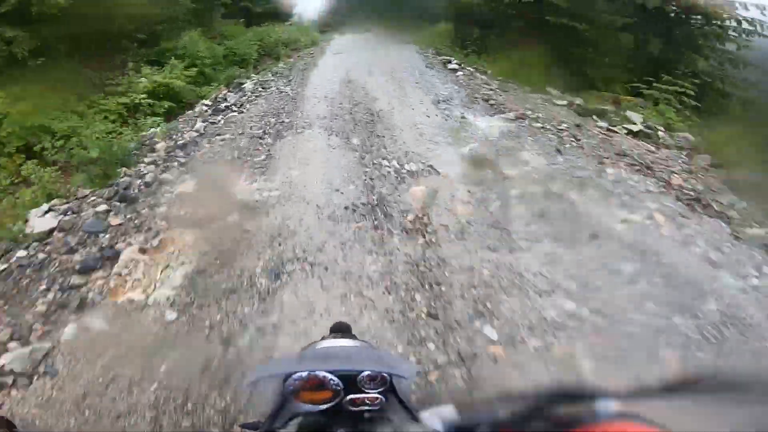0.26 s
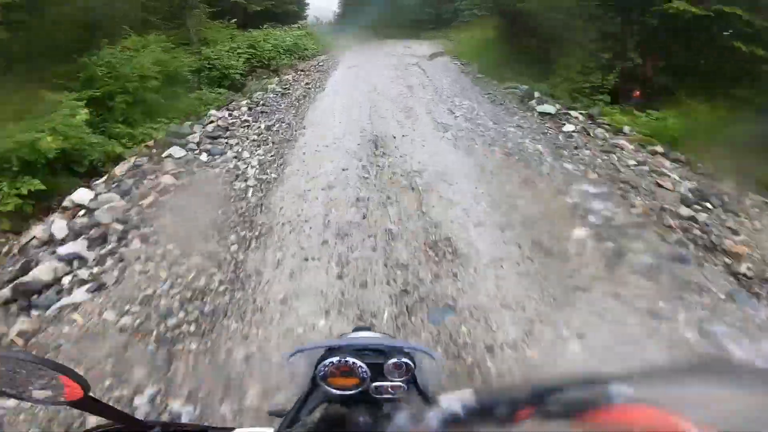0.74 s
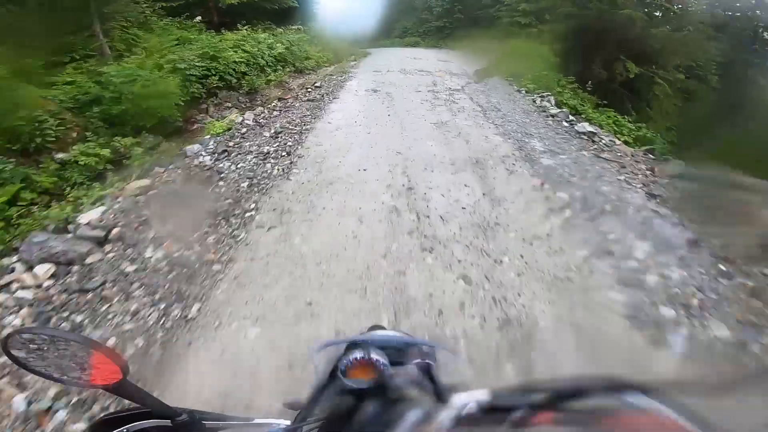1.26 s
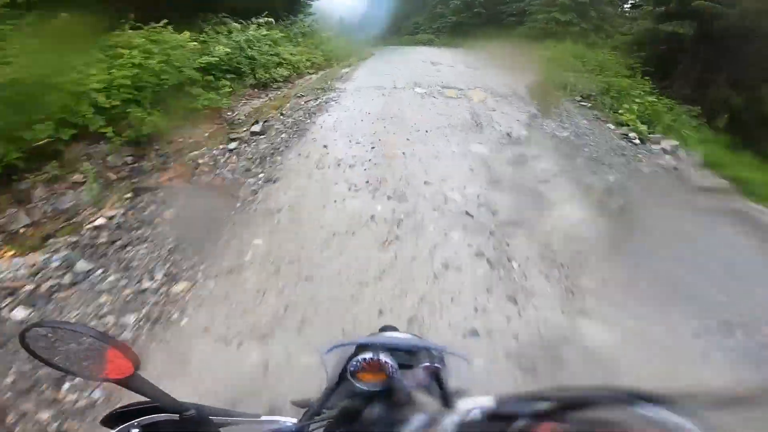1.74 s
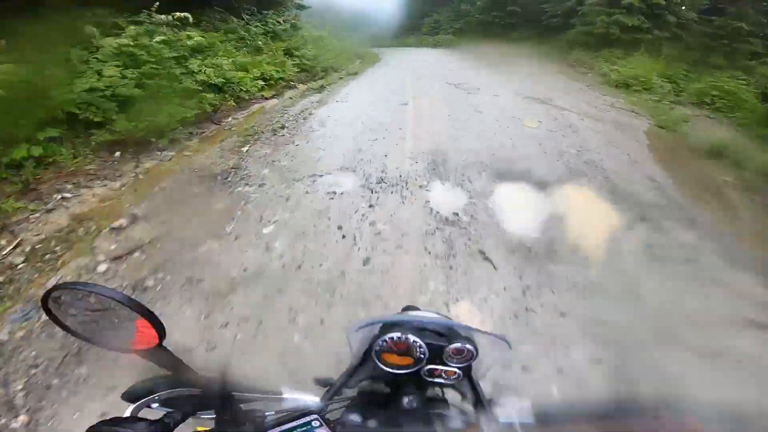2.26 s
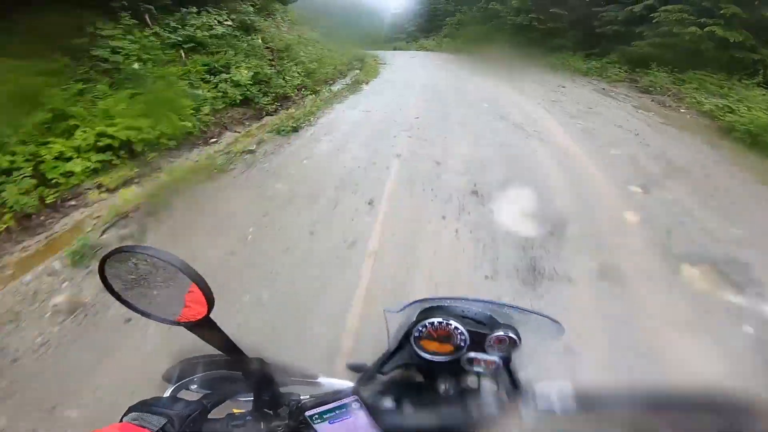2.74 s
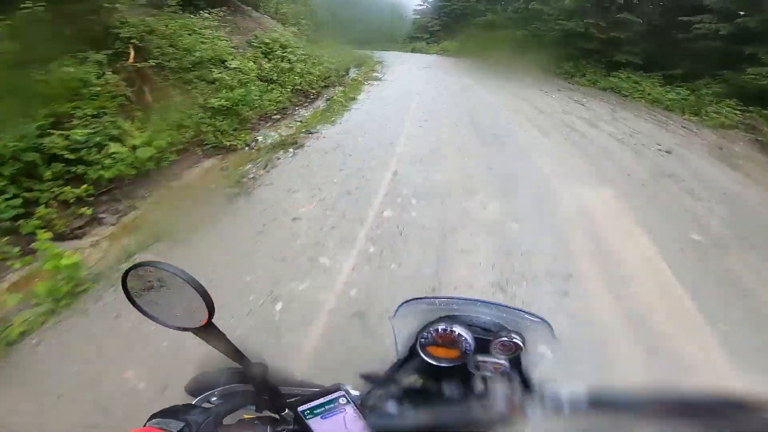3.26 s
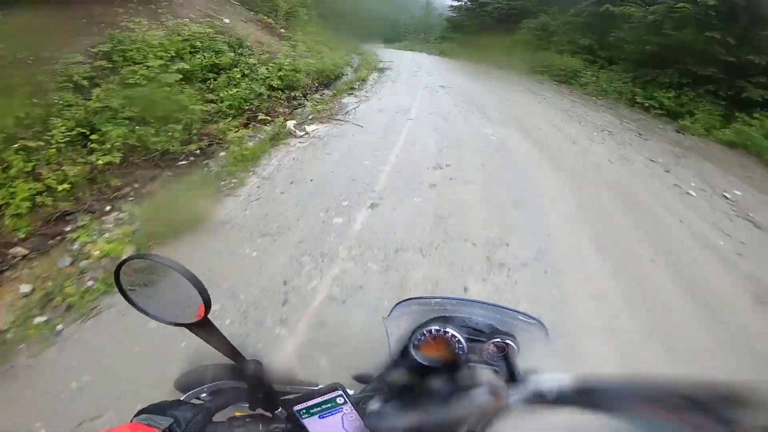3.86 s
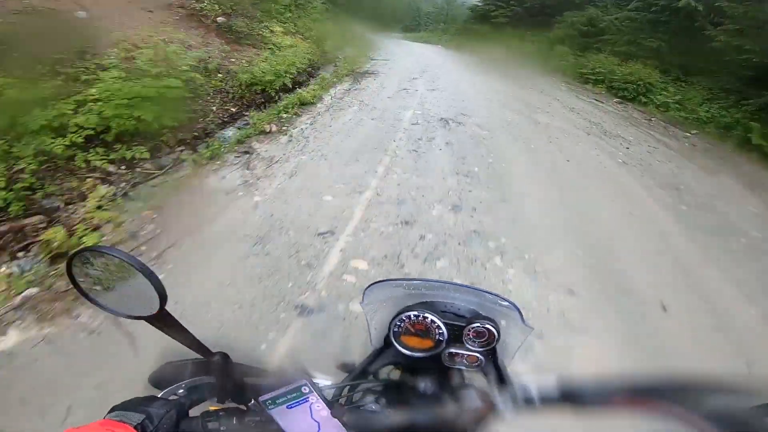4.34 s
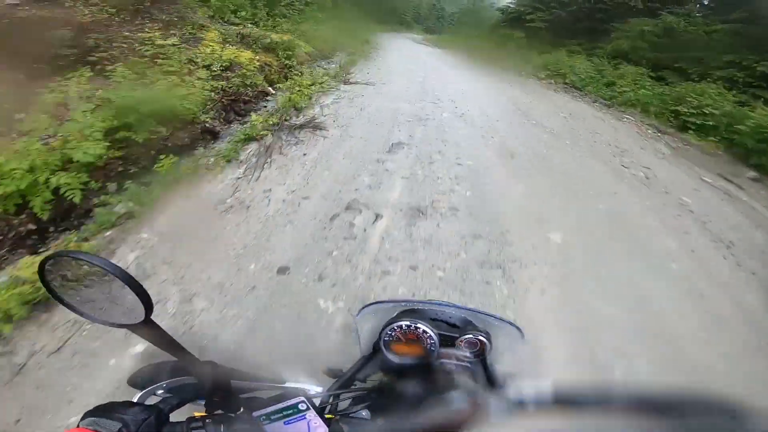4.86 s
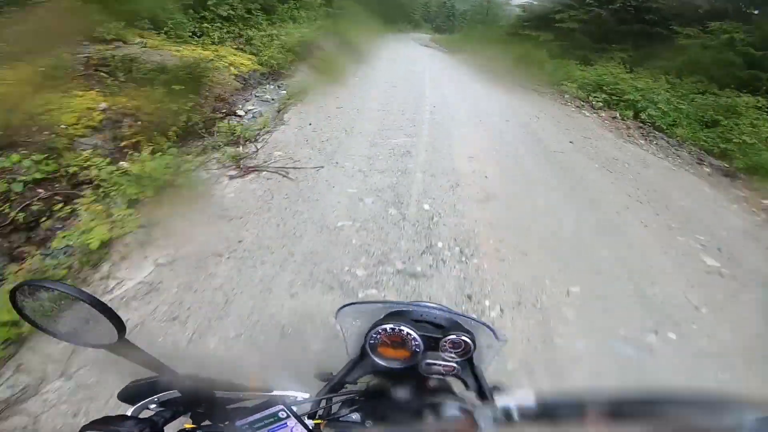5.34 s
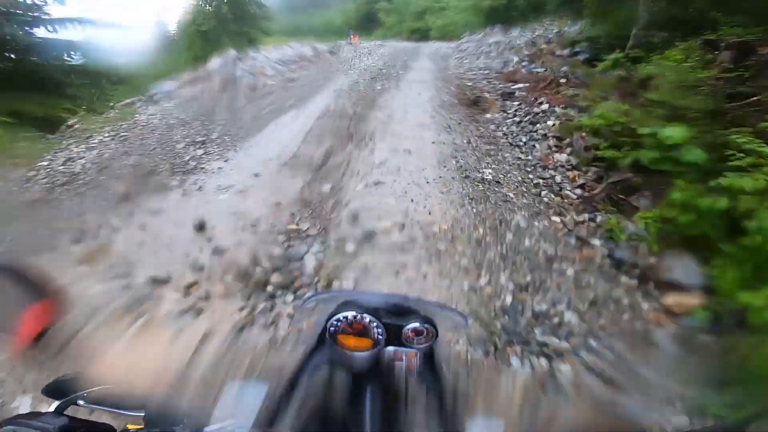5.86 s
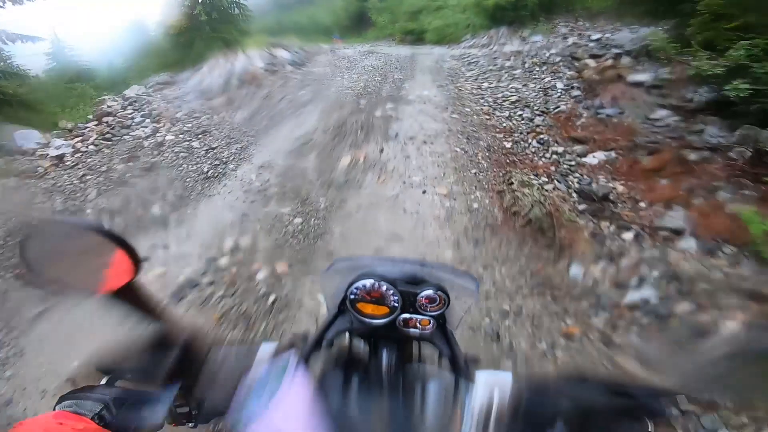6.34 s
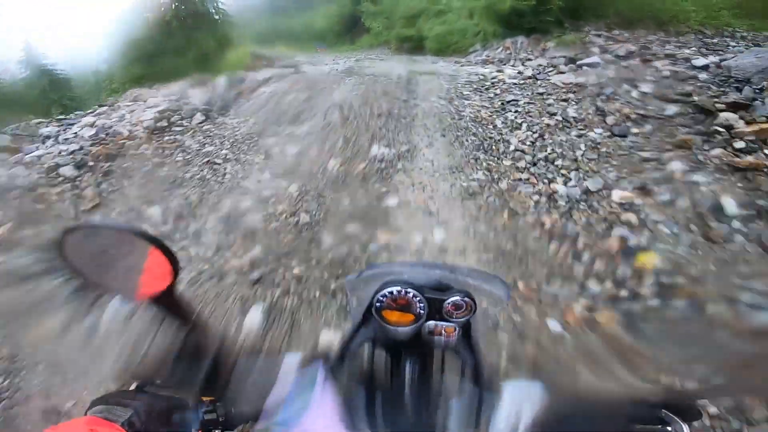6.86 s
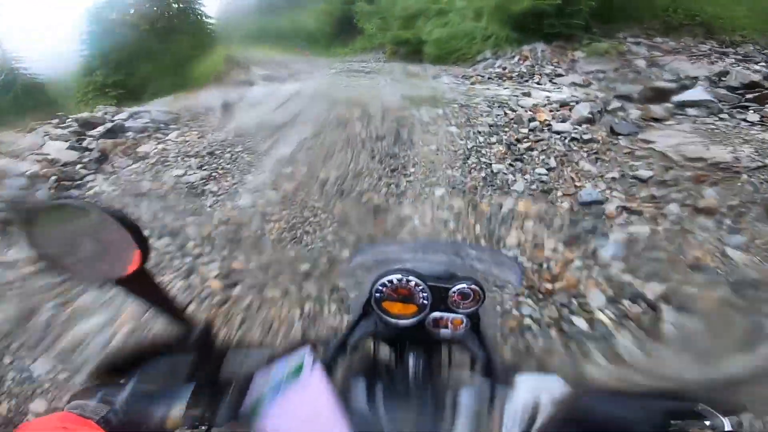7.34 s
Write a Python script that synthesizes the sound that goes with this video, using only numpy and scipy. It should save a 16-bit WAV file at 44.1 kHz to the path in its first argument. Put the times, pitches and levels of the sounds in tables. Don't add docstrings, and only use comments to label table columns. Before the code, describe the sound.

Low throbbing exhaust of a one-cylinder motorcycle over gritty wet tyre noise, with panel rattles and ticking drops, dropping abruptly to a slower beat.

```python
import sys
import numpy as np
from scipy import signal
from scipy.io import wavfile
from scipy.ndimage import uniform_filter1d

SR = 44100
rng = np.random.default_rng(int(sys.argv[2]) if len(sys.argv) > 2 else 0)


def nominal_scale(level):
    x = np.asarray(level, float) / 20
    return 10 ** x


def store_pcm(level_fs):
    pcm = np.round(np.clip(level_fs, -1, 1) * 32767).astype(np.int16)
    wavfile.write(sys.argv[1], SR, np.atleast_2d(pcm).T)


N = 335160
T = np.arange(N) / SR
CUT = round(5.567 * SR)
SLOW = np.arange(N) > CUT


def in_time(table):
    s, *columns = np.transpose(np.vstack(table))
    return [np.interp(T, s, c) for c in columns]


def swells(rows, rest_db, rise_s, fall_s):
    curves = []
    for s, hold, db in rows:
        corners = [s - rise_s, s, s + hold, s + hold + fall_s]
        curves.append(np.interp(T, corners, [rest_db, db, db, rest_db]))
    return np.max(curves, axis=0)


def rms_one(x):
    return x / np.sqrt(np.mean(x ** 2) + 1e-20)


def evened(x, over_s):
    power = uniform_filter1d(x ** 2, round(over_s * SR))
    return rms_one(x / (power + 1e-3 * np.mean(x ** 2)) ** .35)


def noise():
    return rng.standard_normal(N)


def drift(rate):
    r = np.exp(-80 * np.pi * rate / SR)
    slow = signal.lfilter([1], [1, -2 * r, r * r], rng.standard_normal(N // 40 + 2002))[2000:]
    return np.interp(np.arange(N) / 40, np.arange(len(slow)), rms_one(slow))


def ring(x, hz, width):
    r, w = np.exp(-np.pi * width / SR), 2 * np.pi * hz / SR
    return signal.lfilter([0, np.sin(w)], [1, -2 * r * np.cos(w), r * r], x + 1e-18)


def body(x, modes):
    return rms_one(sum(nominal_scale(db) * width * ring(x, hz, width) for hz, width, db in modes))


def band(x, low_hz, high_hz, order=2):
    return signal.sosfilt(signal.butter(order, [low_hz, high_hz], "band", fs=SR, output="sos"), x)


def textured(spectrum, source, patchy_db, unit_hz):
    hz, db = np.transpose(spectrum)
    edges = hz[0] * 2 ** np.arange(0, np.log2(hz[-1] / hz[0]) + .01, 1 / 3)
    together = .4 * drift(6) + .6 * drift(25)
    out = 0
    for k, (low, high) in enumerate(zip(edges, edges[1:])):
        level_db = np.interp(np.log(low * high) / 2, np.log(hz), db)
        flicker_db = patchy_db * (together + drift(27))
        out = out + nominal_scale(level_db + flicker_db) * band(source[k % 2], low, high)
    return out / np.std(band(out, *unit_hz, order=4))


def grit(per_s, spread_db, share):
    sizes = nominal_scale(spread_db * np.minimum(rng.exponential(1, (2, N)), 5)) * rng.choice([-1, 1], (2, N))
    clicks = rms_one(sizes * (rng.random((2, N)) < per_s / SR))
    return np.sqrt(share) * clicks + np.sqrt(1 - share) * rng.standard_normal((2, N))


def clicks_at(events):
    out = np.zeros(N)
    for s, db, *rest in events:
        out[min(round(s * SR), N - 1)] = nominal_scale(db)
    return out


def struck(events, width):
    return sum(ring(clicks_at([row]), row[2], width) for row in events)


# t/s, firings per second
ENGINE_SPEED = [(0.0, 29.38), (1.18, 31.71), (1.39, 29.64), (2.14, 31.58), (2.22, 32.92), (2.72, 28.33),
                (2.87, 29.55), (3.32, 27.35), (3.45, 27.61), (5.19, 25.77), (5.567, 27.71), (5.568, 23.47),
                (5.78, 22.48), (6.16, 24.74), (6.37, 22.79), (6.92, 22.57), (7.0, 20.66), (7.6, 20.38)]


def firing_cycle():
    per_s, = in_time(ENGINE_SPEED)
    cycle = np.cumsum(per_s) / SR
    cycle[CUT:] += np.ceil(cycle[CUT]) - cycle[CUT]
    return per_s, cycle


def once_a_cycle(cycle):
    return np.diff(np.floor(cycle), prepend=-1) > 0


# t/s, throttle 0-1, strain 0-1, burn level/dB
RIDER = [(0.0, 0.95, 0.63, -5.5), (.85, 0.84, 0.65, -3.5), (1.0, 0, 0.05, -3), (1.65, 0.61, 0, -0.5),
         (1.87, 0.57, 0.12, 1), (2.03, 0, 0.1, -5.5), (2.2, 0.9, 0.42, -2), (2.7, 0.27, 0.2, -3),
         (3.05, 0.71, 0.47, -0.4), (4.4, 0.59, 0, -2), (5.56, 0.37, 0.31, -3), (5.58, 0.15, 0, 1.5),
         (6.0, 0, 0.07, -3), (6.27, 0.5, 0.52, -2.5), (6.56, 0.99, 0.69, -3.5), (6.8, 1, 0.75, -2.5),
         (7.0, 0.02, 0.35, -3.5), (7.6, 0.37, 0.26, 1)]


def rider():
    return in_time(RIDER)


# t/s, length/s, loss/dB
CALMS = [
    (2.3, .5, 2.0),
    (6.2, 0.55, 2),
]


def calm_db():
    return swells(CALMS, 0, .1, .1)


# t/s, length/s, top f/Hz
AIRY = [(.35, .015, 14500), (.85, .015, 14300), (1.49, .015, 14400), (3.06, .02, 15100), (3.24, .02, 15800),
        (3.31, .02, 15100), (4.35, .02, 14400), (4.52, .02, 14400), (4.6, .02, 15600), (4.64, .03, 15000),
        (4.73, .02, 14400), (5.31, .02, 14400), (5.38, .02, 14400), (5.57, .02, 15900), (5.67, .02, 15900),
        (5.72, .08, 15100), (5.88, .02, 15100), (6.65, .2, 14100), (6.85, .13, 14400), (7.02, .13, 14300),
        (7.15, .2, 15000), (7.35, .15, 15300), (7.5, .1, 15800)]


def top_hiss():
    hiss, out = noise(), np.zeros(N)
    for s, hold, top_hz in AIRY:
        span = (T >= s) & (T < s + hold)
        out[span] = band(hiss[span], 13600, top_hz, order=4) * np.hanning(span.sum()) ** .25
    return nominal_scale(-76.0) * out


def port_hiss():
    return nominal_scale(-77.5) * rms_one(band(noise(), 10300, 11200))


def wind():
    gusts = rms_one(band(noise() * nominal_scale(3.5 * drift(4.8)), 24, 58, order=3))
    return nominal_scale(-27.0 - .6 * calm_db()) * gusts


# t/s, level/dB
SURFACE = [(0, 4), (.9, 6), (1.9, 1.5), (2.6, 4), (3.25, 0.5), (3.45, -1), (4.9, -2.5), (5.75, -2.5),
           (6.7, 0.7), (7.15, -3), (7.6, -4.5)]


def looseness():
    return in_time(SURFACE)[0]


# f/Hz, level/dB per Hz
RUMBLE = [(125, -2), (190, -0.5), (320, -1), (500, -10), (800, -14)]
# t/s, length/s, loss/dB
QUIETER = [
    (0.17, 0.46, 1.5),
    (6.3, 0.74, 1.5),
    (5.62, 0.51, 3),
    (7.15, .45, 5),
]


def frame_rumble(per_s, gate, loose_db):
    rumble = textured(RUMBLE, gate ** 0.59 * rng.standard_normal((2, N)), patchy_db=1.0, unit_hz=(150, 230))
    level_db = -34 + 0.54 * loose_db + 0.29 * (per_s - 26.0)
    level_db += 0.5 * np.clip(22 - per_s, 0, 2) - swells(QUIETER, 0, 0.049, 0.23)
    return nominal_scale(level_db) * rumble


# t/s, length/s, level/dB
WHEEL_RINGS = [
    (.75, 0.82, 2.5),
    (1.82, 0.45, 3.5),
    (2.5, 0.35, 3),
    (3.05, 0.23, 2.5),
]


def wheel(loose_db):
    spokes = rms_one(ring(noise(), 2938, 58))
    return nominal_scale(-51.5 + loose_db + swells(WHEEL_RINGS, 0, 0.053, 0.14)) * spokes


# f/Hz, level/dB per Hz
TYRE = [(420, 6.5), (600, -0.5), (900, 5), (1300, 0), (1700, 2.5), (2050, -6.5), (2600, 0), (3200, -11.5),
        (3700, -26), (4300, -24)]


def tyres(gate, loose_db):
    source = gate * grit(1500, spread_db=2.0, share=0.37)
    return nominal_scale(-41.5 + loose_db) * textured(TYRE, source, patchy_db=0.98, unit_hz=(1500, 2100))


# f/Hz, level/dB per Hz
SPRAY = [(3400, 5.5), (4200, -3), (5200, 4.5), (6300, -7.5), (7800, -7), (8800, -17), (9600, -35),
         (10700, -19.5), (11700, -36), (13900, -35.5)]
# t/s, length/s, level/dB
PUDDLES = [
    (5.77, 0.035, 5),
    (5.92, .02, 4),
    (5.99, 0.028, 5),
    (6.15, .35, 1.5),
    (7.02, .05, 2.5),
    (6.55, 0.71, 2),
]


def water_spray(gate, loose_db):
    source = gate * grit(900, spread_db=4.0, share=.12)
    spray = textured(SPRAY, source, patchy_db=.45, unit_hz=(4000, 9000))
    spray[CUT:] -= .5 * band(spray, 8100, 9900)[CUT:]
    return nominal_scale(-55.6 + 0.59 * loose_db + swells(PUDDLES, 0, .012, .04)) * spray


# t/s, length/s, level/dB
LOOSE_STONES = [
    (7.25, 0.38, 3.5),
    (0.6, 0.37, 5.5),
    (1.5, 0.23, 7),
]


def loose_stones():
    clatter = rms_one(band(grit(430, spread_db=2.0, share=0.55)[0], 460, 900))
    return nominal_scale(-41.5 + swells(LOOSE_STONES, -23.0, .1, 0.079)) * clatter


# t/s, length/s, level/dB
PATCHES = [
    (0.32, 0.14, -33.5),
    (.68, 0.19, -32),
    (2.2, .4, -52.5),
    (3.0, .2, -55),
    (6.55, 0.57, -37),
    (7.3, 0.42, -41),
]


def gravel_crunch():
    grains = grit(800, spread_db=-9.0, share=0.074)[0] * nominal_scale(2.0 * drift(39))
    crunch = band(rms_one(band(grains, 800, 1650)), 200, 7000)
    return nominal_scale(swells(PATCHES, -48, rise_s=0.36, fall_s=0.23)) * crunch


# t/s, length/s, share lost
THINNED = [
    (5.9, 0.63, 0.43),
    (4.5, 0.25, 0.25),
]


def road(per_s, gate):
    loose_db = looseness()
    out = wind() + wheel(loose_db) + frame_rumble(per_s, gate, loose_db)
    out += tyres(gate, loose_db) + water_spray(gate, loose_db) + loose_stones()
    out -= swells(THINNED, 0, 0.062, .15) * band(out, 370, 760)
    return out + gravel_crunch() + port_hiss()


# t/s, peak level/dB
DROPS = [(0.0772, -58), (0.2862, -58), (0.3421, -62), (1.1638, -63), (1.2266, -60), (2.0901, -58),
         (2.1515, -60), (2.5351, -59), (2.6484, -59), (3.2395, -61), (3.899, -63), (5.4545, -67),
         (5.5174, -60), (5.7324, -49), (7.2639, -54), (7.3158, -62), (7.3951, -62), (2.2233, -65),
         (2.4324, -53), (2.4768, -51), (2.6988, -55), (2.801, -47), (2.9602, -65), (3.1971, -54),
         (3.5937, -69), (3.6516, -62), (3.6581, -45), (3.706, -60), (4.0467, -59), (4.2288, -49),
         (4.2971, -64), (4.3086, -43), (4.6798, -65), (4.787, -70), (5.0205, -44), (5.3268, -48),
         (5.3647, -62), (5.5662, -49), (5.7638, -59), (5.9788, -49), (6.5999, -49), (7.0199, -50),
         (7.0599, -45)]


def drops():
    hits = clicks_at(DROPS)
    return nominal_scale(-1) * band(ring(hits, 11400, 700) + 0.55 * ring(hits, 12700, 700), 10700, 13400, order=4)


# t/s, peak level/dB
STONES = [(.7372, -46), (.814, -41), (1.1917, -48), (2.2917, -48), (3.3109, -48), (5.9344, -50),
          (7.0604, -49), (2.397, -43), (3.4859, -43), (3.7049, -39), (3.9, -42), (4.111, -47),
          (4.5919, -53), (5.7632, -34)]


def stone_pings():
    hits = clicks_at(STONES)
    return 1.5 * band(ring(hits, 7600, 520) + 0.22 * ring(hits, 12000, 600), 6600, 9400, order=4)


# t/s, peak level/dB, f/Hz
KNOCKS = [(0.297, -19, 1040), (0.365, -22, 1050), (0.82, -21, 1500), (2.737, -22, 980), (6.141, -25, 988),
          (2.194, -15, 900), (3.31, -20, 982), (4.228, -23, 969), (5.929, -28, 947), (6.098, -25, 1090),
          (6.33, -12, 1070), (6.711, -13, 1050), (6.969, -22, 972), (7.554, -21, 1080)]


def knocks():
    return 1.6 * band(struck(KNOCKS, 240) + 2.2 * clicks_at(KNOCKS), 750, 2200, order=3)


# t/s, peak level/dB, f/Hz
CLACKS = [(0.29, -22, 549), (0.364, -10, 815), (0.399, -18, 579), (0.753, -20, 880), (0.818, -21, 517),
          (1.006, -11, 587), (1.122, -23, 684), (1.597, -17, 509), (2.958, -20, 727), (3.02, -25, 751),
          (3.296, -20, 759), (3.76, -21, 826), (6.577, -25, 732), (7.262, -29, 751)]


def clacks():
    return nominal_scale(-4.0) * band(struck(CLACKS, 130), 400, 1100)


# t/s, peak level/dB, f/Hz
RATTLES = [(6.0988, -27, 1090), (6.14, -24, 988), (6.3301, -26, 1070), (6.461, -23, 985),
           (6.5124, -23, 980), (6.5488, -30, 982), (6.5678, -19, 1030), (6.6574, -23, 1050),
           (6.7109, -24, 1050), (6.7429, -15, 950), (6.8127, -21, 1070), (6.8484, -18, 1060),
           (6.9689, -16, 972), (7.0182, -23, 1160),
           (0.2006, -24, 942), (0.2694, -24, 1020), (0.2969, -17, 1040), (0.357, -18, 1050),
          (0.519, -21, 1030), (0.5503, -22, 977), (0.577, -21, 1050), (0.703, -20, 1080),
          (0.7693, -23, 1230), (0.8621, -19, 996), (0.989, -23, 1230)]


def slaps():
    return nominal_scale(-4.5) * band(struck(RATTLES, 110), 820, 2000)


def ticks():
    edges = clicks_at([(5.5672, -50), (7.5998, -36)])
    return slaps() + clacks() + drops() + stone_pings() + knocks() + edges


def clatter_gate(cycle):
    return 1 + 0.14 * np.cos(2 * np.pi * (cycle - .4))


def panel_shake(cycle, gate, strain, pull):
    rattle_cycle = cycle - .9
    slow_rattle = 1 + 0.3 * pull * np.cos(2 * np.pi * rattle_cycle)
    rattle = np.where(SLOW, slow_rattle, gate ** (6.3 * strain))
    return rattle, SLOW * pull * once_a_cycle(rattle_cycle)


# t/s, length/s, level/dB
WHINES = [(.6, 0.46, -53), (1.1, .3, -45.5), (1.45, 0.36, -43.5), (1.78, 0.5, -43.5), (2.45, .25, -51),
          (2.83, .25, -44), (3.1, 0.25, -44.5), (3.62, 0.54, -48.5), (4.65, 0.68, -46), (5.25, 0.38, -48.5),
          (5.3, .1, -47.5), (6.15, 0.52, -49.5), (6.8, 0.66, -49.5)]
# t/s, f/Hz
WHINE_PITCH = [(0, 2230), (2.25, 2235), (2.8, 2272), (3.35, 2250), (3.7, 2248), (4.7, 2262), (5.56, 2258),
               (6.2, 2270), (7.6, 2262)]


def gear_whine(shake, gate):
    whine_db = swells(WHINES, -54.5, rise_s=0.072, fall_s=0.15)
    hz = in_time(WHINE_PITCH)[0] + 19 * drift(30)
    tone = np.sin(2 * np.pi * np.cumsum(hz) / SR) * nominal_scale(.8 * drift(20))
    rim = rms_one(ring(ring(shake, 2250, 60), 2250, 120))
    whine = np.where(SLOW, .45, .9) * gate * tone + np.where(SLOW, 1.1, .72) * rim
    return nominal_scale(whine_db + 5.0) * whine, whine_db


# f/Hz, width/Hz, level/dB
CASINGS = [(1374, 25, -0.5), (1455, 25, -4.5), (1764, 110, -8)]


def casing_buzz(shake, whine_db):
    casings = band(body(shake * nominal_scale(0.5 * drift(1.3)), CASINGS), 1170, 1800)
    casings[CUT:] *= .3
    swell_db = swells([(4.8, .72, 1.8)], 0, .08, 0.091)
    return nominal_scale(-40.0 + swell_db + 0.19 * (whine_db + 46.0)) * casings


# t/s, length/s, level/dB
HUM_SWELLS = [
    (6.18, .2, 1.0),
    (6.42, .25, 2.5),
    (6.72, 0.11, -1),
    (7.1, 0.37, 2.0),
]


def fairing_hum(shake, rattle, beat, strain, lugging):
    driven = shake * rattle + 20 * beat
    hum = rms_one(ring(ring(driven, 732, 42), 732, 60))
    hum = evened(hum, over_s=0.086) * nominal_scale(swells(HUM_SWELLS, 0, .03, .04))
    return nominal_scale(-50 + (7 + 13 * SLOW) * strain + 1.5 * lugging) * hum


# f/Hz, width/Hz, level/dB
PANELS = [(975, 37, -2), (1055, 27, -6.5), (1113, 50, -5.5)]
# t/s, length/s, level/dB
BUZZ_SWELLS = [
    (.3, .12, 2),
    (.62, .25, 0),
    (6.17, .12, 1.5),
    (6.55, 0.33, 1),
]


def panel_buzz(shake, rattle, beat, strain):
    driven = (shake * rattle + 18 * beat) * nominal_scale(0.5 * drift(11))
    buzz = band(body(driven, PANELS), 973, 1138)
    buzz = evened(buzz, over_s=.09) * nominal_scale(swells(BUZZ_SWELLS, 0, .04, .05))
    buzz[CUT:] *= nominal_scale(1)
    return nominal_scale(-41.5 + 12.5 * strain) * buzz


# t/s, peak level/dB, f/Hz
THUDS = [(1.483, -8, 319), (2.1, -12.5, 324), (2.477, -14, 307), (3.239, -24, 297), (4.912, -12.5, 317),
         (6.014, -23, 288), (6.135, -18, 304), (6.174, -19, 304), (6.212, -17, 315), (6.254, -22, 295),
         (6.297, -15, 303), (6.341, -21, 310), (7.291, -20, 287), (7.446, -11, 278), (7.505, -12.5, 272),
         (3.385, -6, 286), (3.639, -23, 292), (5.928, -10.5, 316), (6.925, -8.5, 290), (6.966, -11, 312),
         (7.014, -17.5, 328), (7.163, -19, 367), (7.212, -15.5, 352), (7.36, -16.5, 387),
         (7.402, -12.5, 360), (7.553, -9.5, 344)]


def thuds():
    out = sum(ring(ring(clicks_at([row]), row[2], 76), row[2], 190) * 0.032 for row in THUDS)
    return band(out, 225, 480)


# f/Hz, width/Hz, level/dB
AIR_BOX = [(258, 8.8, -2), (297, 40, 10.5), (341, 95, -2.5), (402, 8.6, -24.5)]
# t/s, length/s, level/dB
SNAPS = [
    (0.0, 1, -41),
    (2.2, 0.22, -36),
    (2.8, .5, -35.5),
    (6.3, .6, -42),
    (7.0, 0.55, -38.5),
]
# t/s, length/s, loss/dB
EASES = [
    (4.82, 0.46, 2.5),
    (7.42, 0.12, 6),
]


def air_box(per_s, cycle, throttle, strain, lugging):
    fired = once_a_cycle(cycle - .2 + .1 * strain - lugging / 20)
    pulses = fired * nominal_scale(.9 * drift(18)) + .0014 * noise()
    bark = body(band(pulses / np.sqrt(per_s), 245, 437, order=3), AIR_BOX)
    bark_db = -41.6 + 18.5 * throttle - swells(EASES[:1], 0, .3, 0.2)
    snap = rms_one(band(fired / np.sqrt(per_s), 150, 460)) * nominal_scale(swells(SNAPS, -46, 0.04, .08))
    return nominal_scale(bark_db) * bark + snap


# f/Hz, rms level/dB
SILENCER = [(43, -38), (68, -25), (80, -18), (93, -17.5), (109, -20.5), (121, -33), (136, -31.5),
            (152, -41)]
# level/dB at full strain, level/dB at full throttle
ORDER_SHIFTS = [(17, -1), (3.5, -1.1), (-37.5, 3), (9.5, 2.5), (12, 3)]
# t/s, length/s, level/dB
SURGES = [
    (0.0, 0.76, 3.5),
    (2.6, 0.22, 3.5),
    (3.9, 0.59, 1),
]


def order_levels(per_s, throttle, strain, burn_db):
    hz, db = np.transpose(SILENCER)
    levels = {}
    for order, (pulled, opened) in enumerate(ORDER_SHIFTS, start=2):
        effort = strain ** 2
        if order == 4:
            effort = effort * np.clip((106 - 4 * per_s) / 6, .15, 1)
        through = np.interp(np.log(order * per_s), np.log(hz), db)
        levels[order] = through + burn_db + pulled * effort + opened * throttle
    eased_db = swells(EASES, 0, 0.039, 0.11)
    levels[4] = levels[4] - 0.59 * eased_db
    levels[5] = levels[5] - eased_db + swells(SURGES, 0, 0.074, 0.081)
    levels[6] = levels[6] - eased_db
    return levels


def silencer_boom(per_s, cycle, levels, strain, pull, lugging):
    since = 2 * np.pi * (cycle - .5 - .014 * lugging)
    boom = nominal_scale(-36) * np.cos(since - .9)
    boom = boom + nominal_scale(levels[6] + 1) * np.cos(6 * since + np.where(SLOW, .4 + 2.4 * pull, 1.1))
    fifth_slow = 1.8 * pull - .5 - .2 * lugging
    fifth_fast = .5 - 1.8 * np.clip((5 * per_s - 142) / 4, 0, 1)
    late = {2: 1.2 * np.exp(-((2 * per_s - 55.5) / 2.5) ** 2), 3: 0, 4: 0, 5: np.where(SLOW, fifth_slow, fifth_fast)}
    for order in [2, 3, 4, 5]:
        hz = np.minimum(order * per_s, 112 if order == 4 else 200)
        lag = 2 * np.arctan((hz - 124) / 8) - 2 + late[order]
        unlike_db, wobble = drift(11), .26 * drift(11)
        boom = boom + nominal_scale(levels[order] + 5.5 + unlike_db) * np.cos(order * since - lag + wobble)
    boom *= nominal_scale(.8 * drift(16))
    turbulence = rms_one(band(noise(), 54.2, 128.2, order=4))
    boom += nominal_scale(-25 - 3.2 * strain - calm_db()) * (1 + np.cos(since)) * turbulence
    return boom * np.clip(np.abs(np.arange(N) - CUT) / (.005 * SR), 0, 1)


def engine(per_s, cycle, gate):
    throttle, strain, burn_db = rider()
    pull = np.clip(3 * strain, 0, 1)
    lugging = np.clip(22.6 - uniform_filter1d(per_s, SR // 8), 0, 2.5)
    shake = grit(500, spread_db=-1.0, share=0.31) * gate
    rattle, beat = panel_shake(cycle, gate, strain, pull)
    whine, whine_db = gear_whine(shake[1], gate)
    metal = whine + casing_buzz(shake[1], whine_db)
    metal += fairing_hum(shake[1], rattle, beat, strain, lugging) + panel_buzz(shake[0], rattle, beat, strain)
    intake = thuds() + air_box(per_s, cycle, throttle, strain, lugging)
    levels = order_levels(per_s, throttle, strain, burn_db)
    return metal + intake + silencer_boom(per_s, cycle, levels, strain, pull, lugging)


def scene():
    per_s, cycle = firing_cycle()
    gate = clatter_gate(cycle)
    return (road(per_s, gate) + ticks() + engine(per_s, cycle, gate))[None]


def low_pass(x):
    return signal.sosfilt(signal.butter(12, 16000, fs=SR, output="sos"), x)


def record(dry):
    top_cut = signal.cheby2(8, 24, 13900, fs=SR, output="sos")
    fade = np.clip(.6 + np.arange(N)[::-1] / (.004 * SR), 0, 1)
    limited = 0.7 * np.tanh(dry / 0.85)
    edge = band(clicks_at([(5.5672, -56), (7.5996, -34)]), 12000, 20000)
    mix = fade * signal.sosfilt(top_cut, limited) + top_hiss() + edge
    return low_pass(mix)


dry = scene()
out = record(dry)
store_pcm(out)
```